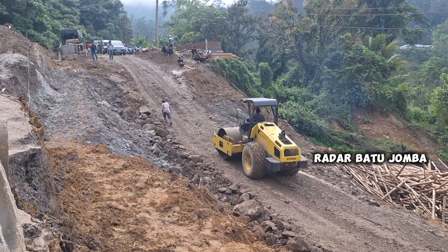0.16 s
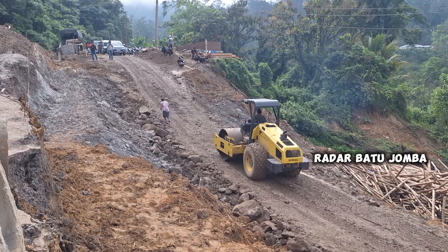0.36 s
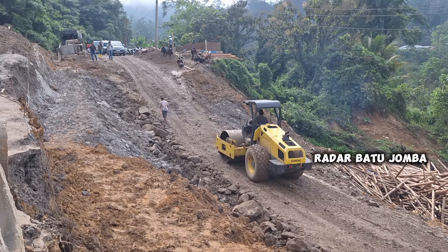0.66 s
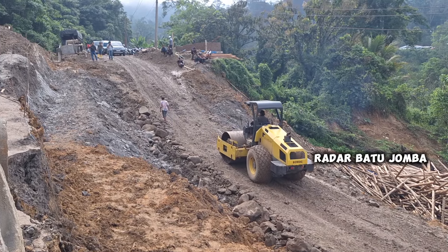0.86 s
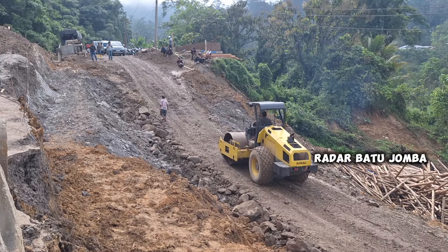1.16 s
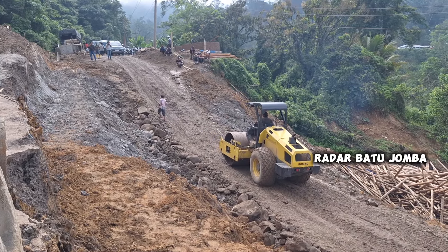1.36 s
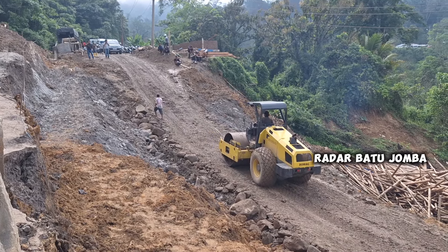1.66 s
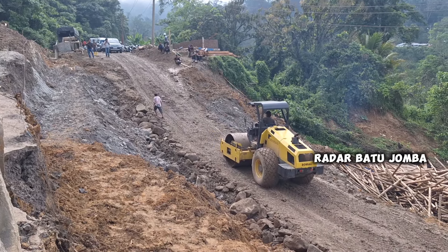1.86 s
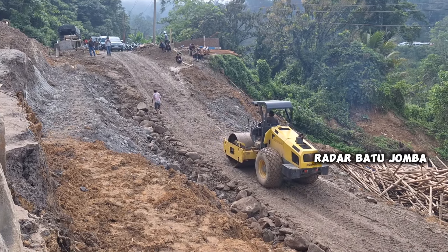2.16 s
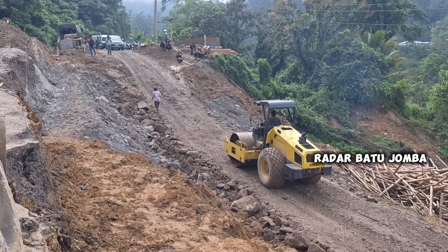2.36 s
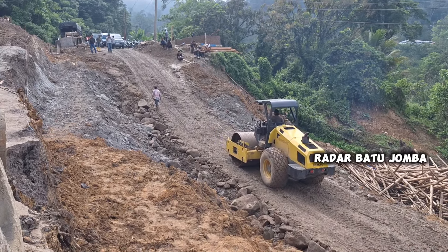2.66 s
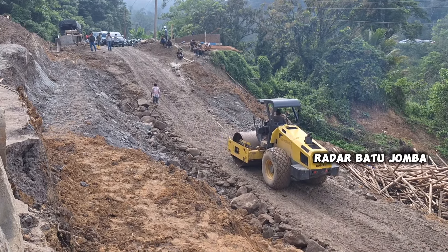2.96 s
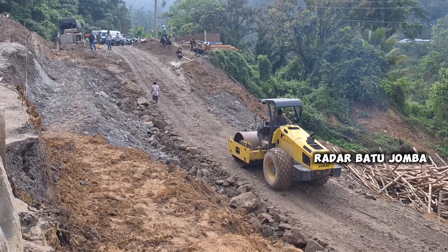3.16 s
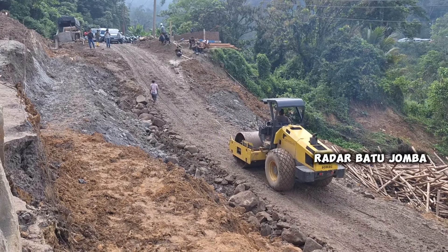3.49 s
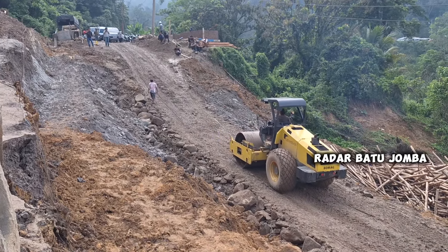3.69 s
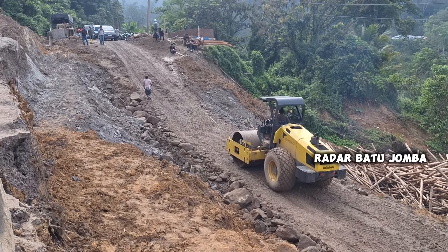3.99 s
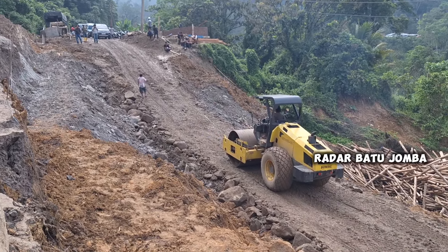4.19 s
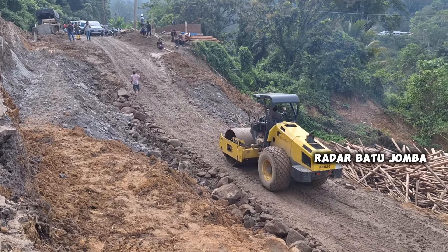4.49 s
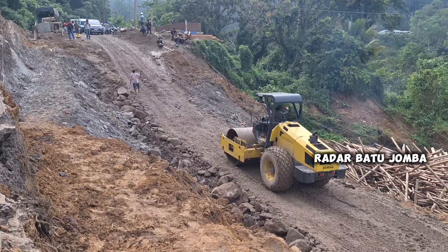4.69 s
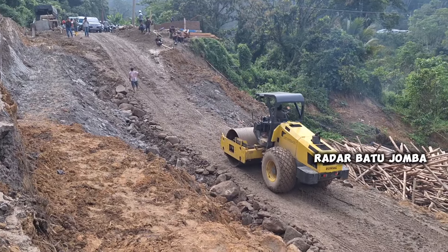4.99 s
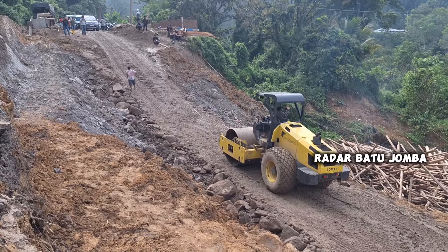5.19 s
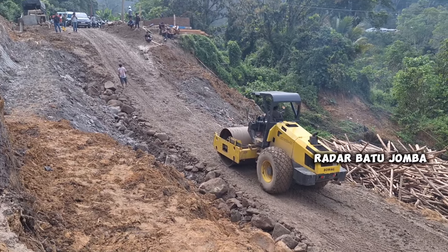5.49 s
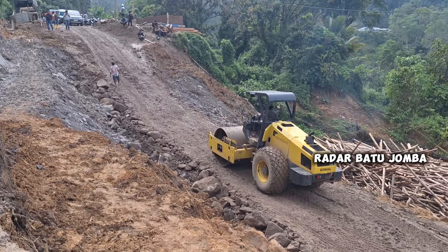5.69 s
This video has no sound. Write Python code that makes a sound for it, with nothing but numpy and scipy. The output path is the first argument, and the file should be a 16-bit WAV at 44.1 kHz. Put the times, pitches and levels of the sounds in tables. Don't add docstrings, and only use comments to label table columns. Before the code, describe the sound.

Outdoors on a dirt slope, a heavy roller's diesel engine drones throughout with a deep, nearly pure hum, rough roar and fast injector clatter. A stone clinks sharply on the steel drum near one second, more softly near two. Dry high squeaks come singly, then cluster between two and three seconds. A stereo microphone hears it from a moderate distance, with no pronounced reverberation.

```python
import sys
import numpy as np
from scipy import signal
from scipy.fft import rfft, irfft, next_fast_len
from scipy.io import wavfile
from scipy.ndimage import uniform_filter1d

SR = 44100
rng = np.random.default_rng(int(sys.argv[2]) if len(sys.argv) > 2 else 0)


def unload_audio(sound):
    columns = np.transpose(np.atleast_2d(sound))
    steps = np.round(np.clip(columns, -1, 1) * 32767)
    wavfile.write(sys.argv[1], SR, steps.astype(np.int16))


def volts(x):
    e = np.asarray(x, float) / 20
    return 10 ** e


N = 257544
TIME = np.arange(N) / SR


def evened(x):
    return x / np.sqrt(np.mean(x ** 2) + 1e-20)


def read(points, hz):
    f, value = np.transpose(points)
    return np.interp(np.log(hz + 1), np.log(f + 1), value)


def curve(table, index):
    columns = np.transpose(table)
    return np.interp(TIME, columns[0], columns[index])


def ramp(start_db, end_db):
    return start_db + (end_db - start_db) * TIME / TIME[-1]


def add(mix, s, sound):
    part = mix[round(s * SR):][:len(sound)]
    part += sound[:len(part)]


def drift(slow_hz, fast_hz):
    t = TIME[::256]
    waves = 0
    for f in np.geomspace(slow_hz, fast_hz, 20):
        waves = waves + np.sin(2 * np.pi * (f * t + rng.random())) / np.sqrt(f)
    return np.interp(TIME, t, evened(waves))


def coloured(x, spectrum):
    hz = np.fft.rfftfreq(N, 1 / SR)
    inside = (hz >= spectrum[0][0]) & (hz <= spectrum[-1][0])
    return evened(irfft(rfft(x) * volts(read(spectrum, hz)) * inside, N))


# [t/s, firing rate f/Hz, level/dB]
ENGINE = [(0.0, 63.7, -13), (0.2, 63.8, -15), (0.5, 63.96, -14.5), (0.7, 64.5, -16), (1.0, 64.35, -16.5),
          (1.3, 64.75, -17), (1.6, 64.18, -17), (1.85, 64.5, -15.4), (2.5, 64.13, -14.5),
          (3.0, 62.9, -15.5), (3.2, 63.7, -15.5), (3.4, 63.55, -16), (3.75, 63.8, -15.8),
          (4.2, 62.25, -14.5), (4.5, 63.3, -14.5), (4.8, 64.14, -15), (5.3, 63.68, -15.6),
          (5.6, 64.06, -15.5)]
# [multiple, start level/dB, end level/dB, sway depth 0-1, crest t/s]
STRONG_ORDERS = [(2, -37.5, -35, 0.9, .38), (3, -45, -42.5, 0.83, 0.22), (4, -39.5, -35.5, 0.27, 0.16),
                 (5, -41.5, -50, 0.26, 0.61), (5.25, -45, -40, 0.06, 1.13), (9, -51.5, -47.5, 0.62, 1.16),
                 (12, -49.5, -39.5, 0.16, 0.8), (13, -43.5, -46.5, 0, .1)]
# [multiple, start level/dB, end level/dB]
WEAK_ORDERS = [(.5, -51, -56), (.75, -39, -41.5), (1.25, -53, -56), (1.5, -54.5, -42), (3.75, -49, -44),
               (4.25, -53, -47.5), (6, -55, -57), (10, -47.5, -55.5), (11, -64, -45), (11.75, -62.5, -49),
               (12.75, -60, -61)]


def exhaust(firings):
    sway_s = 1.321
    sag_db_per_hz, free_hz = 1, 63.26
    burn_turns = .51
    lean_turns = .13

    hum_db = curve(ENGINE, index=2) + 0.13 * drift(3.3, 25.0)
    out = volts(hum_db) * np.cos(2 * np.pi * (firings + burn_turns))
    load_db = sag_db_per_hz * (free_hz - curve(ENGINE, index=1))
    for k, start_db, end_db, depth, crest_s in STRONG_ORDERS:
        sway = np.sqrt(1 + depth * np.cos(2 * np.pi * (TIME - crest_s) / sway_s))
        level_db = ramp(start_db, end_db) + load_db + .8 * drift(1.5, 15.0)
        offset = lean_turns + (k > 2.5) * rng.random()
        turns = k * (firings + burn_turns) + offset + .015 * drift(1.5, 12.0)
        out = out + volts(level_db) * sway * np.cos(2 * np.pi * turns)
    for k, start_db, end_db in WEAK_ORDERS:
        level_db = ramp(start_db, end_db) + 1.6 * drift(.5, 6.0)
        turns = k * firings + rng.random() + .03 * drift(1.5, 12.0)
        out = out + volts(level_db) * np.cos(2 * np.pi * turns)
    return np.sqrt(2) * out


# [t/s, effort level/dB]
LOAD = [(0.0, -1), (.6, -.5), (1.1, 1), (1.45, 0.5), (1.8, 1.5), (2.3, 0.5), (2.8, -2), (3.3, 0.5),
        (4.3, -2), (4.7, -1.5), (5.4, 0.4), (5.84, 3)]
# [t/s, length t/s, dull level/dB, sharp level/dB]
JOLTS = [(0.878, 0.023, 3, 4), (.91, 0.044, 2, 2), (1.416, 0.02, 4, 4), (1.876, 0.027, 4, 3.5),
         (1.928, 0.068, 4, 3), (1.965, 0.024, 7, -2.5), (2.55, 0.059, -1, 2), (2.633, 0.041, 2.5, 0.5),
         (3.33, 0.051, 3, 0.5), (3.67, 0.049, 1.5, -0.5), (3.8, .1, 3.5, -1.5), (4.404, 0.048, 3, 2.5),
         (4.515, 0.023, -2, 4.5), (4.68, .12, 2, 0), (4.757, 0.024, 1.5, 3), (5.562, 0.16, -4, 1.5)]
# [start level/dB, end level/dB, share of the effort, share of a dull jolt, share of a sharp jolt]
LAYERS = [(-37, -36, 0.77, 1.07, 0.22), (-35, -33.5, .4, 0.75, 0.5), (-38, -34.5, .4, .1, 0.99),
          (-61.5, -59.5, .9, 0.02, .5)]


def layer_db(index):
    start_db, end_db, effort, dull, sharp = LAYERS[index]
    t = TIME[::32]
    jolts = 0
    for s, length, dull_db, sharp_db in JOLTS:
        swell = np.exp(-.5 * ((t - s) / (length / 2)) ** 2)
        jolts = jolts + (dull * dull_db + sharp * sharp_db) * swell
    return ramp(start_db, end_db) + effort * curve(LOAD, index=1) + np.interp(TIME, t, jolts)


# [level/dB, one per cylinder]
CYLINDERS = [(-3.5, -2, 0, -1), (-1.5, 1, -3, -2), (-1, 0, -1, -1.1), (0, 1, -3, 0.5)]


def machine_noise(firings, index, spectrum, puff, fade, lag, uneven_db, extra_db):
    turn = firings - lag
    burn = np.floor(turn).astype(int) + 2
    size_db = np.array(CYLINDERS[index])[burn % 4] + uneven_db * rng.standard_normal(500)[burn]
    puffs = 1 + puff * np.exp(-(turn % 1) / fade)
    gate = volts(uniform_filter1d(size_db, 100)) * puffs * volts(extra_db)
    return volts(layer_db(index)) * coloured(evened(gate) * rng.standard_normal((2, N)), spectrum)


# [f/Hz, level/dB per Hz]
RUMBLE = [(105, 0), (125, -6), (165, -8), (215, -2), (250, -2.5), (292, -2), (335, -3.5), (400, -5.5),
          (470, -15.5), (520, -11.5)]


def rumble(firings, shake):
    return machine_noise(firings, index=0, spectrum=RUMBLE, puff=0.57, fade=0.2, lag=0.14,
                         uneven_db=-0.5, extra_db=0.1 * shake)


# [f/Hz, level/dB per Hz]
ROAR = [(270, -8.5), (460, -12), (482, -10), (560, -10.5), (604, -4.5), (769, 0), (883, -1), (1020, -6),
        (1120, -16), (1250, -21), (1620, -46), (2750, -120)]


def roar(firings, shake, loose):
    return machine_noise(firings, index=1, spectrum=ROAR, puff=0.57, fade=0.75, lag=.4,
                         uneven_db=1.0, extra_db=.5 * shake + 0.55 * loose)


# [f/Hz, level/dB per Hz]
CLATTER = [(1000, 0), (1080, -3.5), (1300, -0.5), (2000, 0.5), (2300, -2), (2760, -0.5), (3210, -4),
           (3700, -7), (4600, -7.5), (5500, -9), (6000, -12), (6660, -17), (7740, -25), (8600, -32)]


def clatter(firings, shake, loose):
    return machine_noise(firings, index=2, spectrum=CLATTER, puff=0.17, fade=0.1, lag=.6,
                         uneven_db=0.95, extra_db=0.043 * shake + 0.92 * loose)


# [f/Hz, level/dB per Hz]
HISS = [(4710, -37), (8000, -21), (8620, -6), (9410, 1), (11900, -2), (15500, -5)]


def hiss(firings, shake, loose):
    return machine_noise(firings, index=3, spectrum=HISS, puff=0.37, fade=.2, lag=.6,
                         uneven_db=0.4, extra_db=.15 * shake + .7 * loose)


def grit(per_s, fade_s):
    hits = rng.random(N) * (rng.random(N) < per_s / SR)
    return signal.lfilter([1], [1, -np.exp(-1 / (fade_s * SR))], hits)


# [f/Hz, width f/Hz, start level/dB, end level/dB]
WHINES = [(2256, 91, -51, -61), (2450, 280, -54, -44.5), (3610, 400, -61, -47), (5260, 250, -58, -49.5),
          (5770, 109, -62, -52), (7360, 1070, -57, -60), (11050, 60, -79, -76), (11450, 1100, -71, -62),
          (12700, 2400, -79, -64)]


def whines():
    hz, out = np.fft.rfftfreq(N, 1 / SR), np.zeros((2, N))
    white = rfft(rng.standard_normal((2, N)))
    for f, width, start_db, end_db in WHINES:
        band = evened(irfft(white / (1 + (2 * (hz - f) / width) ** 2), N))
        out += volts(ramp(start_db, end_db) + 1.5 * drift(2.1, 20.0)) * band
    return out


# [f/Hz, level/dB per Hz]
GROUND = [(15, -11), (30, -12), (45, -7), (70, 13.5), (95, 15.5), (115, -12), (150, -34)]


def ground():
    return volts(-38.5) * coloured(rng.standard_normal((2, N)), GROUND)


# [t/s, length t/s, first level/dB, last level/dB]
SQUEAKS = [(0.001, .016, -44, -56), (0.49, 0, -52, -52), (0.732, 0, -51, -50), (0.841, 0, -49, -46),
           (0.939, .016, -50, -48), (0.998, .016, -54, -50), (1.043, 0, -52, -51.5), (1.247, 0, -47, -45),
           (1.494, 0, -52, -50), (1.589, 0, -50, -49), (1.884, .016, -50, -43), (2.041, .031, -38, -48),
           (2.102, .016, -42, -48), (2.165, .031, -47, -37.5), (2.26, 0, -49, -45), (2.381, .031, -41, -45),
           (2.474, .016, -42, -46), (2.521, .031, -51, -47), (2.6, 0, -48, -47), (2.63, 0, -46, -45),
           (2.695, .016, -46, -40.5), (2.961, 0, -46, -45), (3.249, 0, -45, -45), (3.844, 0, -49, -49),
           (4.003, 0, -50, -53), (4.225, 0, -52, -45), (4.29, 0, -49, -47), (4.436, 0, -52, -51)]


def squeaks():
    slip_s = .0155
    joint_hz, spread_hz = 7410, 110
    out, t = np.zeros(N), np.arange(1200) / SR
    shape = 3.2 * (1 - np.exp(-t / .003)) ** 2 * np.exp(-t / .0037)
    for s, length, first_db, last_db in SQUEAKS:
        slips = round(length / slip_s) + 1
        for i, db in enumerate(np.linspace(first_db, last_db, slips)):
            bend, split, turn = rng.random(3)
            low_hz = joint_hz + spread_hz * (2 * bend - 1)
            high_hz = low_hz + 170 + 90 * split
            pair = np.sin(2 * np.pi * low_hz * t) + .8 * np.sin(2 * np.pi * (high_hz * t + turn))
            add(out, s + i * slip_s, volts(db) * shape * pair)
    return out


# [t/s, length t/s, from f/Hz, to f/Hz, level/dB]
TWITTER = [
    (.355, .045, 11500, 12750, -70),
    (0.431, .05, 12600, 12900, -69),
    (.49, .06, 11500, 11100, -68),
    (.545, .035, 13000, 12300, -69),
]


def twitter():
    glide_share = .55
    out = np.zeros(N)
    for s, length, from_hz, to_hz, db in TWITTER:
        t = np.arange(0, length, 1 / SR)
        hz = from_hz + (to_hz - from_hz) * np.minimum(t / (glide_share * length), 1)
        note = np.sin(2 * np.pi * np.cumsum(hz) / SR)
        add(out, s, volts(db) * note * signal.windows.tukey(len(t), .3))
    return out


# [t/s, peak level/dB]
CLINKS = [
    (0.8737, -22),
    (1.9081, -28),
]
# [f/Hz, width f/Hz, level/dB]
DRUM = [(970, 50, -1), (1610, 50, -6), (1930, 35, -3), (2250, 50, -1.5), (2500, 45, 1.5), (2720, 70, -2.5),
        (4060, 45, -11), (4680, 60, -2), (5970, 50, -16)]


def clinks():
    out, t, white = np.zeros(N), np.arange(3000) / SR, rng.standard_normal(N)
    crack, tick = coloured(white, CLATTER)[:len(t)], coloured(white, HISS)[:len(t)]
    for s, db in CLINKS:
        hit = (.3 * np.exp(-t / 0.0087) + 1.3 * np.exp(-t / .0012)) * crack
        hit = hit + 0.079 * np.exp(-t / 0.0036) * tick
        for f, width, mode_db in DRUM:
            hit = hit + volts(mode_db) * np.exp(-np.pi * width * t) * np.sin(2 * np.pi * (f * t + rng.random()))
        hit = hit * (1 - np.exp(-t / 0.0002))
        add(out, s, volts(db - 4.0) * hit)
        add(out, s + 0.0099, volts(db - 11.0) * hit)
    return out


# [f/Hz, likeness 0-1]
LIKENESS = [(30, 0.93), (400, 0.96), (520, 0.83), (800, 1), (1200, 0.82), (2000, 0.92), (3000, 0.85),
            (4300, 0.68), (5000, 0.46), (6200, 0.8), (8300, 0.41), (10000, 0.19), (12000, 0.39),
            (15000, .42)]
# [f/Hz, level/dB]
LEFT_DB = [(40, 3), (125, 1.5), (400, 0), (900, -0.5), (1400, 2), (1900, -2.5), (2700, -12), (3800, -12),
           (5000, -10), (5700, -10), (7800, 2.5), (10500, -2.5), (13000, -12), (15500, 8)]
# [f/Hz, phase/radians]
LEFT_LEADS = [(40, -0.42), (75, -0.42), (125, -0.25), (400, -0.1), (1200, -0.06), (2150, 0.6), (3790, 1.32),
              (5000, 2.5), (5940, 1.5), (7500, 2), (9900, 10), (11500, -5.5), (13000, 9), (15200, 18)]


def ports(direct, scattered):
    size = next_fast_len(N + 8192)
    hz, edge = np.fft.rfftfreq(size, 1 / SR), (size - N) // 2
    a, b = rfft(np.pad([direct, scattered], [(0, 0), (edge, size - N - edge)], "reflect"))
    same = read(LIKENESS, hz)
    half = volts(read(LEFT_DB, hz) / 2) * np.exp(.5j * read(LEFT_LEADS, hz))
    left = a * half
    right = (same * a + np.sqrt(1 - same ** 2) * b) / half
    return irfft(np.array([left, right]), size)[:, edge:edge + N]


def scene():
    firings = np.cumsum(curve(ENGINE, index=1)) / SR
    shake, loose = drift(2.5, 40.0), grit(per_s=55.0, fade_s=0.0079)
    noise = rumble(firings, shake) + roar(firings, shake, loose)
    noise += clatter(firings, shake, loose) + hiss(firings, shake, loose)
    direct, scattered = noise + whines() + ground()
    machine = ports(direct + exhaust(firings), scattered)

    joint = squeaks()
    early_joint = (np.roll(joint, -1) + np.roll(joint, -2)) / 2
    short = volts([[9.0], [11.0]]) * np.array([joint, early_joint])
    short += volts([[4.0], [-8.0]]) * twitter()
    short += volts([[-3.0], [2.5]]) * clinks()
    return machine + short


def roll_off(x):
    return signal.sosfilt(signal.butter(12, 15610, fs=SR, output="sos"), x)


def record(dry):
    return roll_off(dry)


dry = scene()
out = record(dry)
unload_audio(out)
```